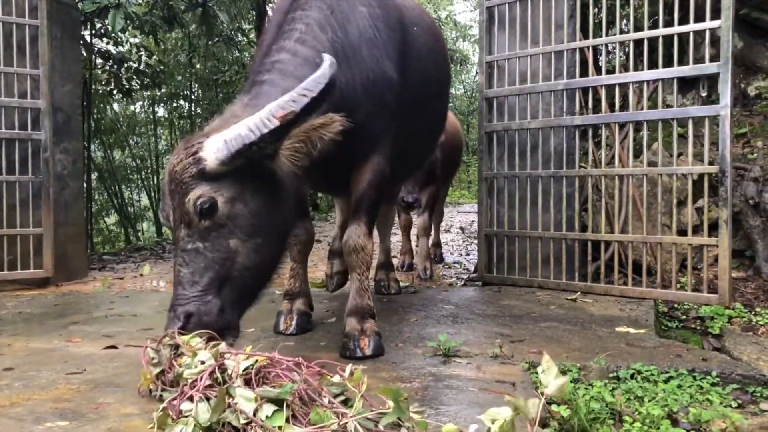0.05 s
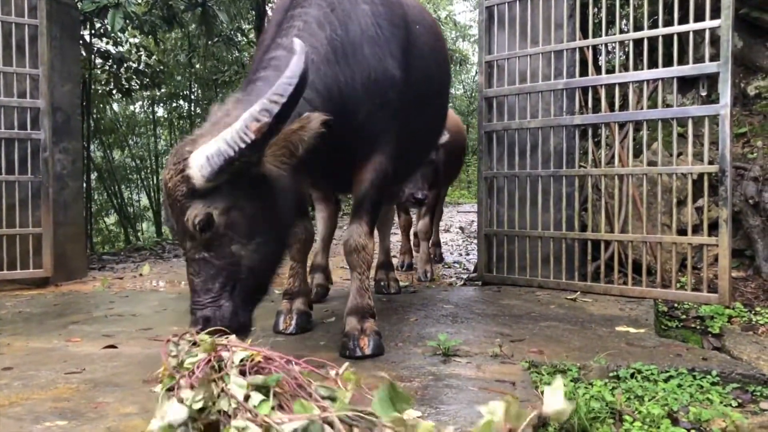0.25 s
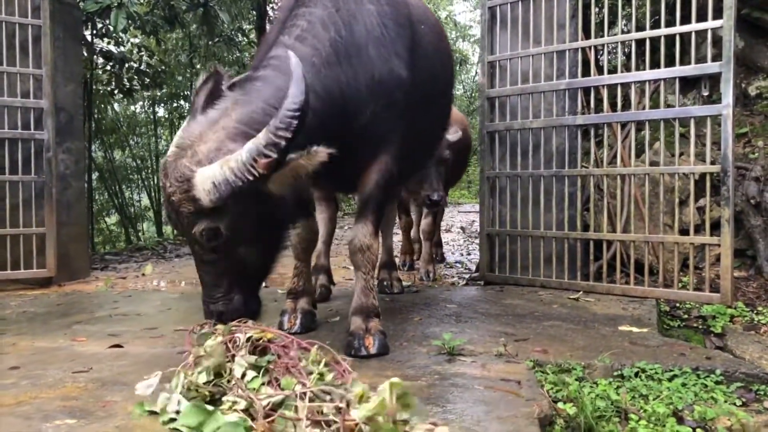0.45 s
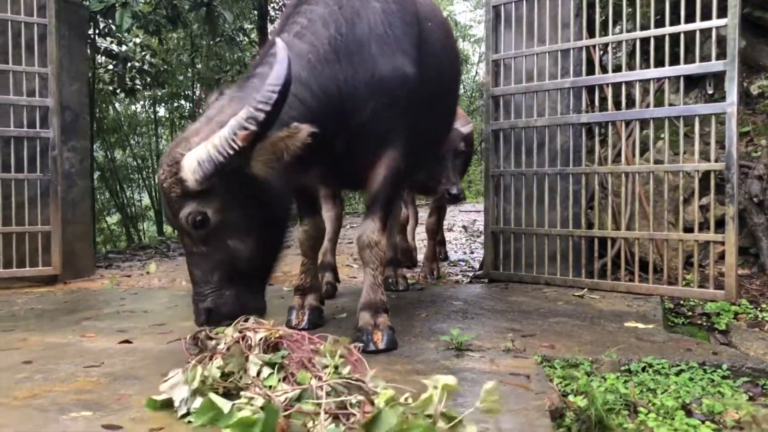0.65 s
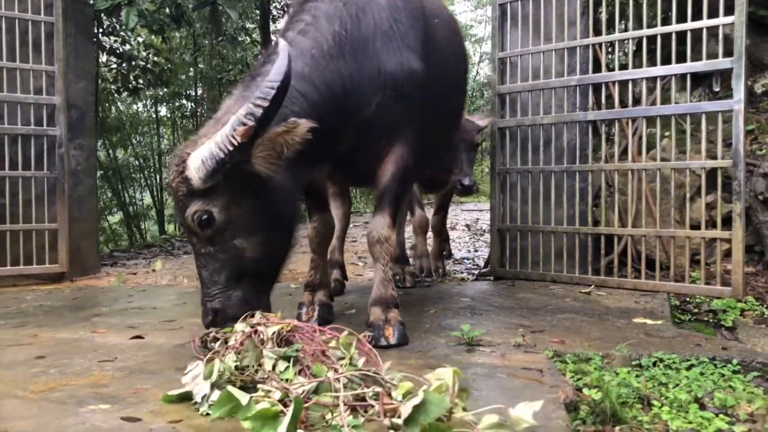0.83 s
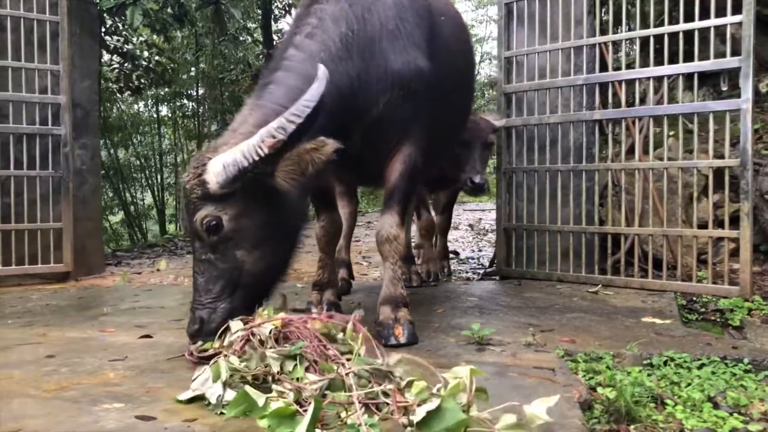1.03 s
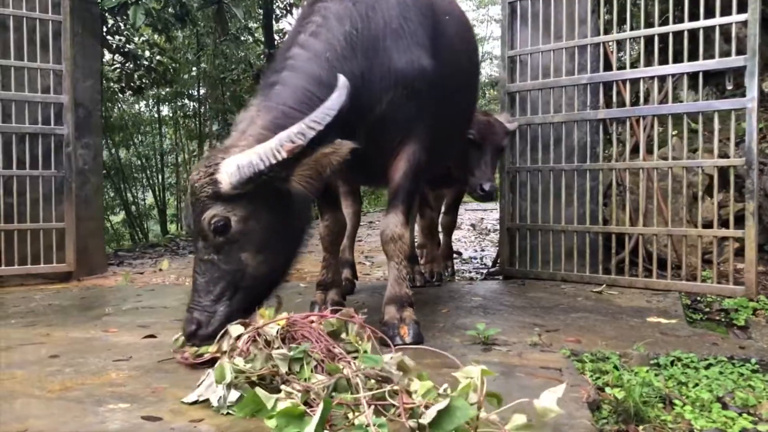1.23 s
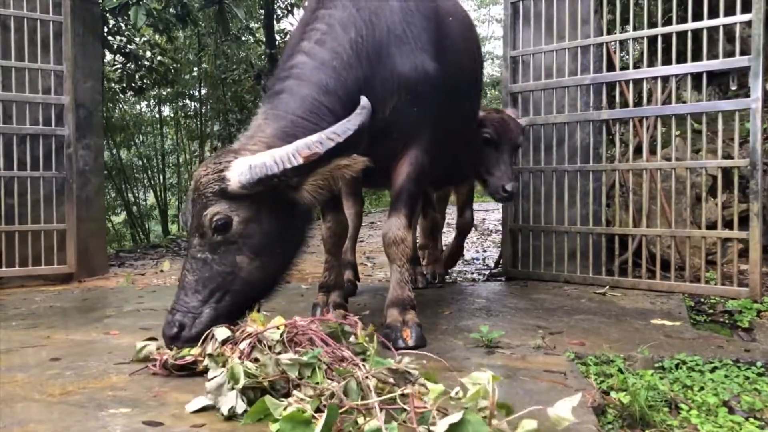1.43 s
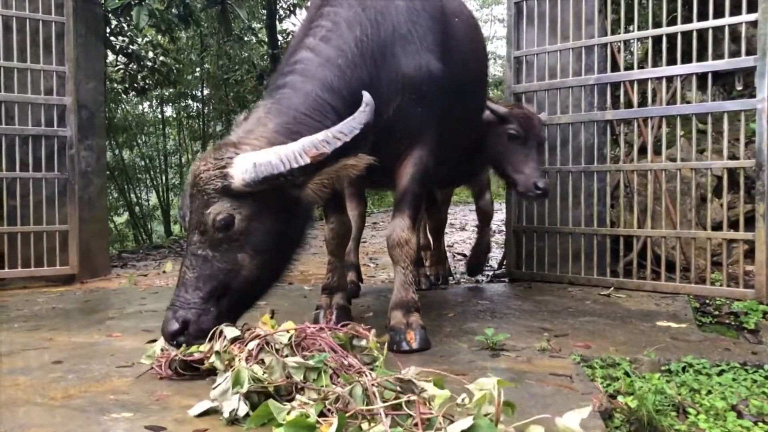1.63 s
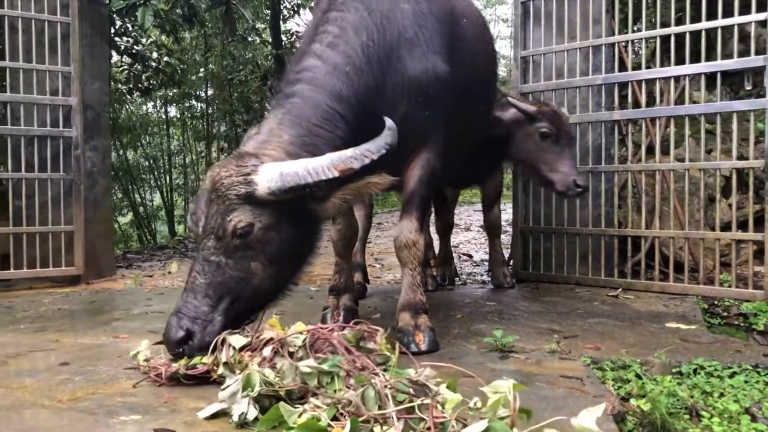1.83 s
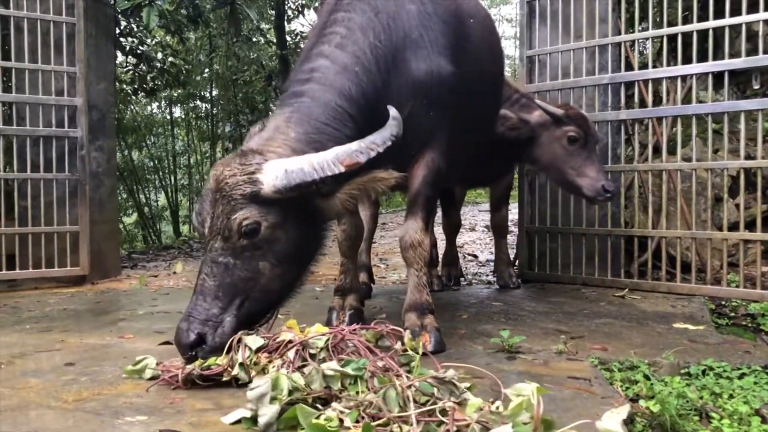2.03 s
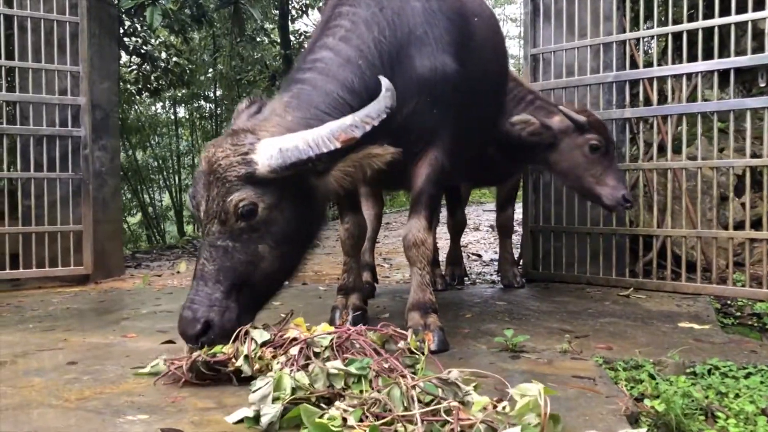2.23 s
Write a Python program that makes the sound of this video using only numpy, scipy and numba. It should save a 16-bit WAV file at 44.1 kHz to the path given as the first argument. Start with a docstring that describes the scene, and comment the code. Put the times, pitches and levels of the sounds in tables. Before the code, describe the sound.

A water buffalo feeds on leafy vines close to a mono microphone: leaves rustle first, then stems snap, jaws grind and wet lips pop in uneven bursts, over steady soft hiss in an open concrete yard.

```python
"""An open concrete yard: a water buffalo feeds on a heap of leafy vines, close to a mono microphone.
Leaves swish as shaped crackle and hiss, stalks tick, jaws grind as clicks in sinking mouth resonances,
the heap thuds as low noise, wet pops are sines sinking in pitch, stems snap as short rough rings.
A steady outdoor hiss of coloured noise lies beneath; a faint echo follows the feeding sounds."""
import sys
import numpy as np
from scipy import signal
from scipy.fft import rfft, irfft
from scipy.io import wavfile
from scipy.ndimage import uniform_filter1d
from numba import njit

SR = 44100
rng = np.random.default_rng(int(sys.argv[2]) if len(sys.argv) > 2 else 0)


def wav_record(signal):
    """Record a signal, one row per channel, as 16-bit PCM in the file named by sys.argv[1]."""
    frames = np.transpose(np.atleast_2d(signal))
    bounded = np.clip(frames, -1, 1)
    # unit amplitude maps onto the largest positive 16-bit level
    quanta = np.round(bounded * 32767).astype(np.int16)
    wavfile.write(sys.argv[1], SR, quanta)


N = 100415  # samples


def undb(db):
    """Decibels to gain."""
    return 10 ** (np.asarray(db) / 20)


def unit(x):
    """Scale to rms 1."""
    return x / np.sqrt(np.mean(x ** 2) + 1e-20)


def since(start_s):
    """Seconds after start, zero before it."""
    return np.maximum(np.arange(N) / SR - start_s, 0)


def noise():
    """White noise."""
    return rng.standard_normal(N)


@njit
def svf(x, hz, width):
    """State-variable band-pass with a moving centre; width is relative to the centre."""
    y, band_state, low_state = np.empty(len(x)), 0., 0.
    for i in range(len(x)):
        g = np.tan(np.pi * hz[i] / SR)
        v = (band_state + g * (x[i] + 1e-18 - low_state)) / (1 + g * (g + width))
        band_state = 2 * v - band_state
        low_state = low_state + 2 * g * v
        y[i] = width * v
    return y


def band(x, hz, width):
    """One resonance, constant or moving."""
    centre_hz = np.clip(hz * np.ones(N), 30, .44 * SR)
    return svf(x, centre_hz, float(width))


def double_band(x, hz, width):
    """The same resonance twice in series, for steeper skirts."""
    return band(band(x, hz, width), hz, width)


def one_pole(x, hz, kind):
    """Gentle first-order low-pass or high-pass."""
    return signal.sosfilt(signal.butter(1, hz, kind, fs=SR, output="sos"), x)


def colour(x, points):
    """Filter by (Hz, dB) points joined over log frequency, to rms 1."""
    hz, db = np.array(points).T
    f = np.maximum(np.arange(N + 1) * SR / (2 * N), 1)
    gain = undb(np.interp(np.log(f), np.log(hz), db))
    return unit(irfft(rfft(x, 2 * N) * gain)[:N])


def grains(rate_per_s, scatter_db):
    """Clicks at random times and signs; their sizes scatter exponentially in dB, to rms 1."""
    size = undb(scatter_db * np.minimum(rng.exponential(size=N), 5))
    return unit((rng.random(N) < rate_per_s / SR) * size * np.sign(noise()))


def walk(rate_per_s):
    """Random drift: straight lines between smoothed random steps, rms 1."""
    k = int(SR / rate_per_s)
    steps = np.repeat(noise()[:N // k + 1], k)
    return unit(uniform_filter1d(steps, k)[:N])


def swell(start_s, rise_s, hold_s, fall_s):
    """Rise, hold and an easing fall."""
    up = np.clip(since(start_s) / rise_s, 0, 1)
    down = np.clip(1 - since(start_s + rise_s + hold_s) / fall_s, 0, 1)
    return up * down ** 1.14


# Spectrum of the outdoor hiss. Each row: frequency in Hz, gain in dB.
HISS_SPECTRUM = [(15, -58), (25, -4), (148, 0), (215, -3.5), (389, -6.5), (457, -8), (782, -3.5),
                 (1050, -10.5), (1660, -8), (1800, -14), (2010, -11), (3000, -12), (3440, -11),
                 (11500, -18), (15500, -18.5)]
HISS_DB = -52
SHIMMER_HZ, SHIMMER_WIDTH, SHIMMER_DB = 4450, 0.063, -65.5


def outdoor_hiss():
    """Coloured noise with a slight level drift, plus a faint, narrow high band."""
    drift_db = .5 * walk(5.56)
    hiss = undb(HISS_DB + drift_db) * colour(noise(), HISS_SPECTRUM)
    return hiss + undb(SHIMMER_DB) * unit(band(noise(), SHIMMER_HZ, SHIMMER_WIDTH))


# Spectrum of rustling leaves. Each row: frequency in Hz, gain in dB.
LEAF_SPECTRUM = [(60, -37), (150, -6.5), (300, -2.5), (500, -1.5), (750, -2), (1000, 0.5), (2600, 0),
                 (4000, -3.5), (7000, -4.5), (10000, -9), (15500, -9)]
# Muzzle pushes through the leaves. Each row: start in seconds, rise in seconds, hold in seconds,
# fall in seconds, level in dB, treble gain in dB, crackle resonance in Hz, resonance level in dB.
SWISHES = [(-.15, 0.22, 0.38, 0.37, -50, 4, 4200, -12.5),
           (0.248, 0.11, 0.062, 0.16, -39.5, -1.5, 3060, -21),
           (0.398, 0.064, 0.084, 0.038, -44, -7.5, 2380, -4.5),
           (0.64, 0.07, 0.039, .05, -54.5, -6, 2900, -14.5), (1.022, 0.063, 0.023, 0.1, -46, -8, 2430, -26),
           (1.251, 0.076, 0.021, 0.16, -40, -11, 1390, -16.5),
           (1.352, 0.074, .04, 0.32, -53, 8, 6460, -6.5), (1.62, 0.094, .05, 0.1, -62, 8, 6540, -8),
           (1.809, 0.069, 0.26, 0.19, -48.5, 2.5, 6430, -13),
           (1.943, 0.038, 0.024, 0.16, -47, -3, 2740, -3), (2.236, .03, .03, .05, -54, 8, 2020, -4)]
LEAF_GRAINS_PER_S, LEAF_SCATTER_DB, LEAF_HISS_DB = 5000, 1.5, -1.5
LEAF_SPLIT_HZ, LEAF_BAND_WIDTH = 8800, 0.73  # treble begins at the split


def leaves():
    """Dense leaf contacts crackle and hiss; each push has its own treble and resonance."""
    crackle = grains(LEAF_GRAINS_PER_S, LEAF_SCATTER_DB)
    rustle = colour(crackle + undb(LEAF_HISS_DB) * noise(), LEAF_SPECTRUM)
    body = one_pole(rustle, LEAF_SPLIT_HZ, "low")
    treble = rustle - body
    out = np.zeros(N)
    for start_s, rise_s, hold_s, fall_s, db, treble_db, hz, ring_db in SWISHES:
        ring = unit(double_band(crackle, hz, LEAF_BAND_WIDTH))
        swish = body + undb(treble_db) * treble + undb(ring_db) * ring
        out += undb(db) * swell(start_s, rise_s, hold_s, fall_s) * swish
    flutter_db = 0.69 * walk(40.56)
    return out * undb(flutter_db)


TICKS_PER_S, TICK_DB, TICK_HZ, TICK_WIDTH = 60, -61, 1490, 1.64


def ticks():
    """Small stalks tick softly at random: sparse clicks through a broad resonance."""
    clicks = grains(TICKS_PER_S, scatter_db=2.9)
    return undb(TICK_DB) * unit(double_band(clicks, TICK_HZ, TICK_WIDTH))


# Grinding strokes of the jaws. Each row: start in seconds, rise in seconds, hold in seconds,
# fall in seconds, level in dB, mouth resonance at the start in Hz, its fall in octaves per second.
GRINDS = [(0.022, 0.19, .07, .11, -44.5, 807, 1.5), (0.313, 0.021, 0.045, 0.07, -52.5, 860, 0.61),
          (0.744, 0.02, 0.043, 0.031, -45, 1020, 10.2), (0.883, 0.012, 0.065, 0.052, -59.5, 850, 4.4),
          (1.608, 0.014, 0.014, 0.043, -44.5, 623, 7.8), (1.918, 0.07, 0.033, 0.054, -42.5, 785, .5),
          (2.041, 0.016, 0.093, 0.4, -45, 774, 4.4)]
GRIND_GRAINS_PER_S, GRIND_WIDTH = 820, 0.79
MOUTH_LOW_RATIO, MOUTH_LOW_DB = 0.61, -0.5  # second, lower resonance


def jaws():
    """Fibres crush between the teeth, muffled by a mouth whose two resonances sink."""
    crush = grains(GRIND_GRAINS_PER_S, scatter_db=-2.2)

    def ring(hz):
        """Crushing through one mouth resonance, at an even level as its centre moves."""
        return unit(double_band(crush, hz, GRIND_WIDTH) / np.sqrt(hz))

    out = np.zeros(N)
    for start_s, rise_s, hold_s, fall_s, db, hz, octaves_per_s in GRINDS:
        stroke_s = np.minimum(since(start_s), rise_s + hold_s + fall_s)
        mouth_hz = hz * 2 ** (-octaves_per_s * stroke_s)
        mouth = unit(ring(mouth_hz) + undb(MOUTH_LOW_DB) * ring(MOUTH_LOW_RATIO * mouth_hz))
        out += undb(db) * swell(start_s, rise_s, hold_s, fall_s) * mouth
    return out


# Dull bumps of the muzzle on the heap. Each row: start in seconds, rise in seconds,
# hold in seconds, fall in seconds, level in dB.
BUMPS = [(0.063, 0.095, 0.095, 0.12, -50.5), (0.505, 0.014, 0.0077, 0.07, -50.5),
         (0.912, .025, 0.053, .05, -59.5), (1.065, 0.015, 0.034, 0.063, -59),
         (1.325, 0.025, .02, 0.07, -54), (1.615, .015, .02, 0.066, -49), (1.853, 0.21, .06, .3, -49)]
BUMP_HZ, BUMP_WIDTH = 140, 1.5


def heap():
    """The heap thuds softly as the muzzle shoves it: swells of low noise."""
    thud = unit(double_band(noise(), BUMP_HZ, BUMP_WIDTH))
    return thud * sum(undb(db) * swell(*shape) for *shape, db in BUMPS)


# Wet pops of lips and tongue. Each row: start in seconds, starting pitch in Hz, peak level in dB,
# swell time in ms.
POPS = [(0.143, 1500, -38, 1.4), (.7185, 1430, -30.5, 1.5), (.7180, 790, -36.5, 1.3),
        (.7780, 1132, -24.5, 1.9), (.7785, 545, -30, 2.3), (.8010, 370, -52, 5), (.9683, 950, -33, 0.98),
        (0.9686, 1770, -34.5, 0.79), (0.9704, 654, -21, 1.77), (.9835, 640, -59, 1.3),
        (1.0783, 930, -25, 0.47), (1.0918, 1070, -33, 1), (1.2103, 870, -37, 1.1), (1.3487, 1300, -31, .8),
        (1.6022, 1240, -33.5, 0.88), (1.6190, 1370, -37, 2), (1.6250, 1170, -37, 0.97),
        (1.6302, 670, -29.5, 1.7), (1.6290, 334, -38.5, 1.9), (1.6450, 610, -39, 3.1),
        (1.6785, 843, -41.5, 5.8), (1.7060, 836, -49, 3), (1.8690, 1070, -38.5, 1.4),
        (1.8935, 1120, -24, 0.59), (1.9570, 1420, -21.5, 0.47), (1.9580, 654, -30.5, 1.5),
        (2.0654, 1760, -20, 0.56), (2.0672, 556, -24, 1.7), (2.0755, 760, -24.5, 1.16),
        (2.0770, 148, -40, 7.2)]
POP_SAG, POP_SAG_CYCLES = 0.21, 3.2  # share of pitch lost, over how many cycles
POP_SHAPE, POP_FIZZ_DB = 1.57, -30


def pops():
    """Small wet cavities open, ring for a few cycles and sink in pitch."""
    out, fizz = np.zeros(N), unit(band(noise(), 3000, 4.0))
    for start_s, hz, db, swell_ms in POPS:
        t = since(start_s)
        cycles, age = hz * t, t * 1000 / swell_ms
        sagging = POP_SAG_CYCLES * (1 - np.exp(-cycles / POP_SAG_CYCLES))
        phase = (1 - POP_SAG) * cycles + POP_SAG * sagging
        envelope = (age * np.exp(1 - age)) ** POP_SHAPE  # peaks at 1 after swell_ms
        out += undb(db) * envelope * (np.sin(2 * np.pi * phase) + undb(POP_FIZZ_DB) * fizz)
    return out


# Snapping stems. Each row: start in seconds, starting pitch in Hz, level in dB, decay in ms,
# bright crack in dB relative to the ring.
SNAPS = [(0.31, 3980, -43, 0.97, -8.5), (0.7161, 3950, -37, 1.4, -4), (0.7183, 4374, -28.5, 0.84, -16),
         (0.9041, 5160, -30, 1.24, -11), (.9049, 2270, -37, 0.87, -10), (0.971, 4900, -38.5, 0.72, 3.5),
         (1.0076, 2840, -31, 0.6, -10), (1.0905, 3650, -29, 1.4, -16), (1.2650, 2000, -35.5, 1.4, -10),
         (1.351, 2480, -27.5, 0.75, -17), (1.368, 2980, -22, 0.48, -11), (1.6200, 2500, -35, 2.5, -16),
         (1.6250, 2210, -28.5, 1.34, -15), (1.9604, 2950, -20, 0.57, -17), (2.01, 2950, -27, 1.3, -16),
         (2.0657, 3600, -20, 0.69, -14), (2.0748, 3230, -21, 1.34, -5.5), (2.262, 2100, -35.5, 3.7, -6)]
SNAP_ROUGH, SNAP_SAG, SNAP_CRACK_HZ = 0.15, 0.23, 4030  # rough and sag are shares of pitch


def snaps():
    """A stem breaks with a bright crack and a very short, rough ring that sinks."""
    out, rough = np.zeros(N), walk(3000)
    crack = unit(one_pole(noise(), SNAP_CRACK_HZ, "high"))
    for start_s, hz, db, decay_ms, crack_db in SNAPS:
        t = since(start_s)
        fade = (t > 0) * np.exp(-t / (decay_ms / 1000))
        pitch_hz = hz * (1 - SNAP_SAG * (1 - fade) + SNAP_ROUGH * rough) * (t > 0)
        ring = np.sin(2 * np.pi * np.cumsum(pitch_hz) / SR)
        out += undb(db) * fade * (ring + undb(crack_db) * crack)
    return out


ECHO_DB, ECHO_T60_S, ECHO_HZ, ECHO_WIDTH = -19, 0.17, 940, 2.2


def yard(x):
    """A faint, short echo from the ground and walls: convolution with decaying noise."""
    tail = band(noise(), ECHO_HZ, ECHO_WIDTH) * undb(-60 * since(0) / ECHO_T60_S)
    tail = tail / np.sqrt(np.sum(tail ** 2))
    return x + undb(ECHO_DB) * signal.fftconvolve(x, tail)[:N]


def scene():
    """The feeding animal over the outdoor hiss, alike in both channels."""
    hiss = outdoor_hiss()
    feeding = pops() + snaps() + leaves() + ticks() + jaws() + heap()
    mono = yard(feeding) + hiss
    return np.array([mono, mono])


LOW_CUT_HZ, TOP_HZ = 44, 15800


def record(dry):
    """The recorder cuts the deep bass and the top steeply."""
    dry = signal.sosfilt(signal.butter(6, LOW_CUT_HZ, "high", fs=SR, output="sos"), dry)
    return signal.sosfilt(signal.ellip(10, .2, 80, TOP_HZ, fs=SR, output="sos"), dry)


dry = scene()
out = record(dry)
wav_record(out)
```